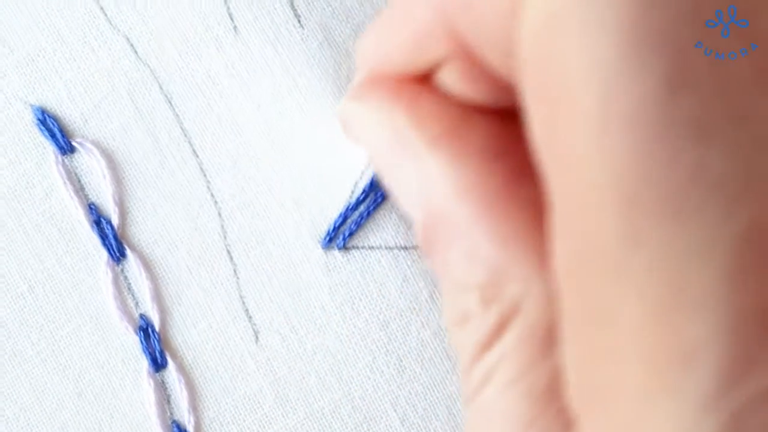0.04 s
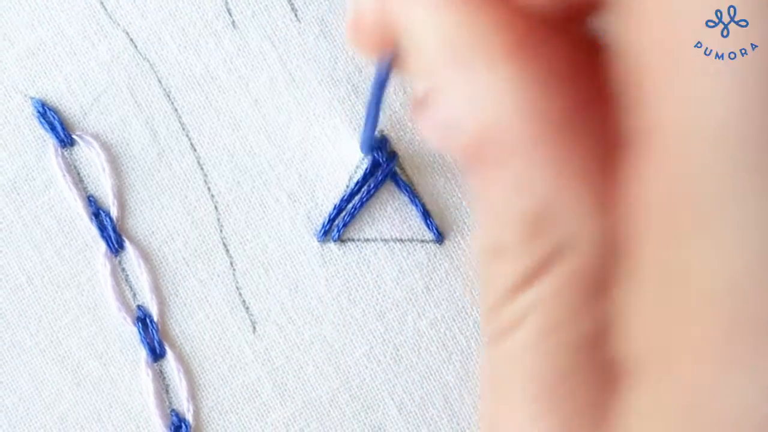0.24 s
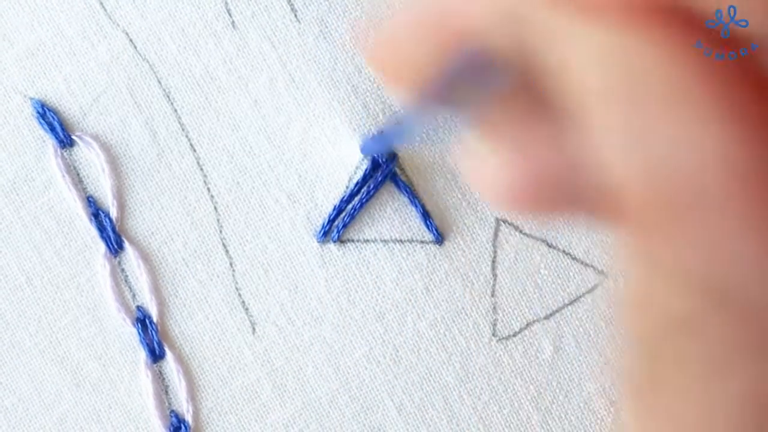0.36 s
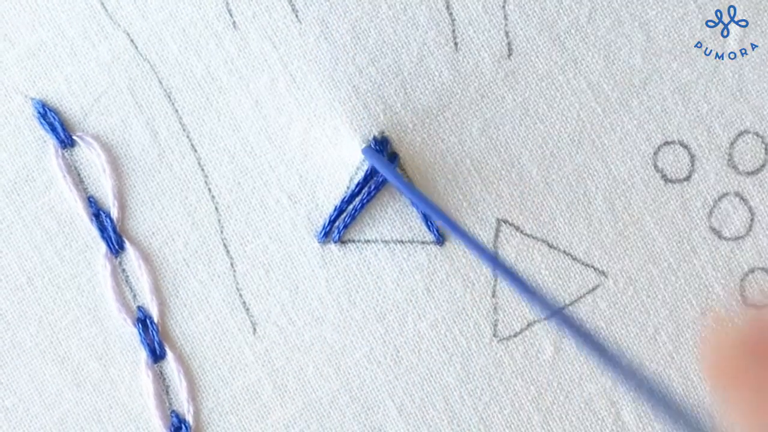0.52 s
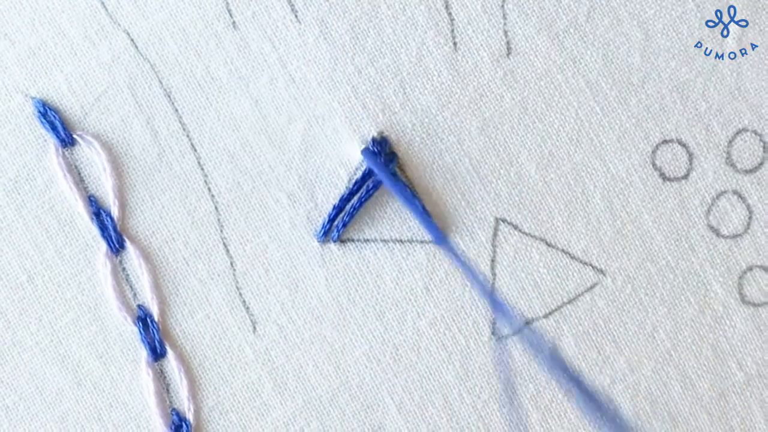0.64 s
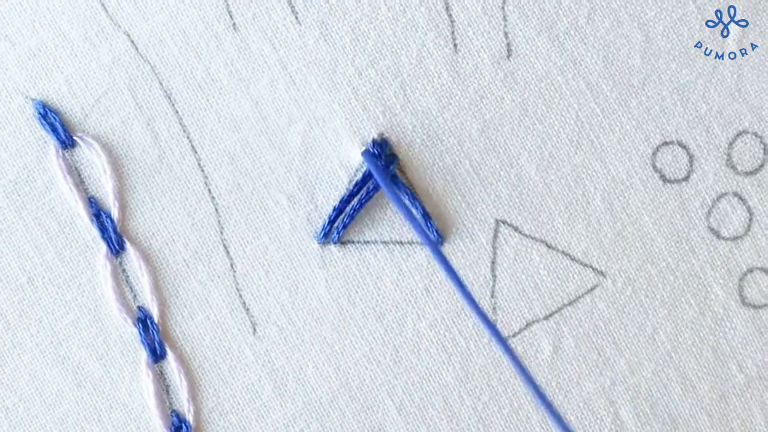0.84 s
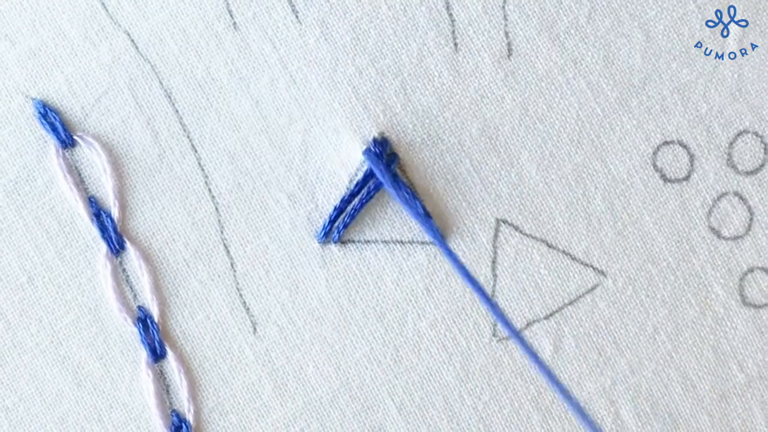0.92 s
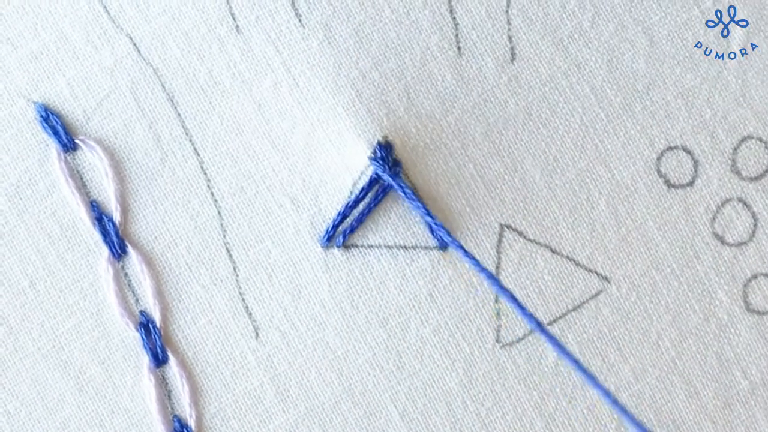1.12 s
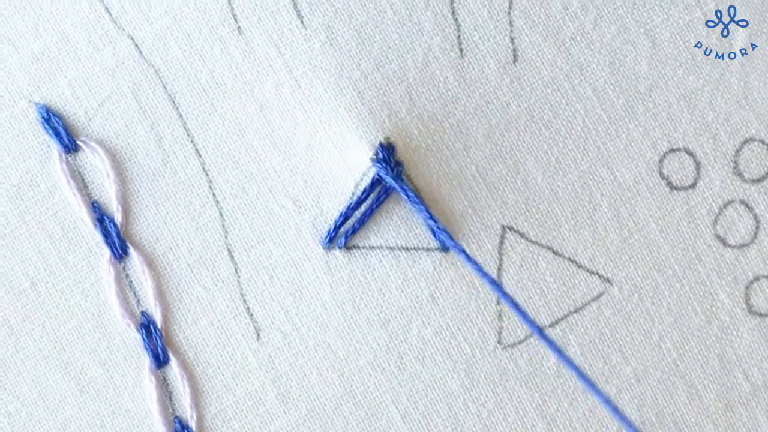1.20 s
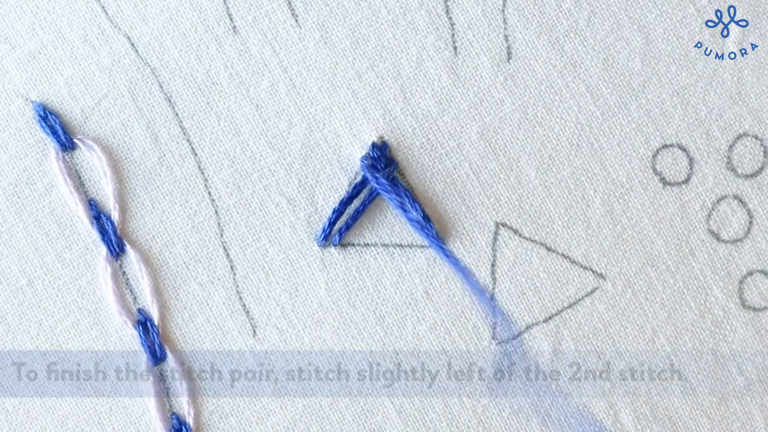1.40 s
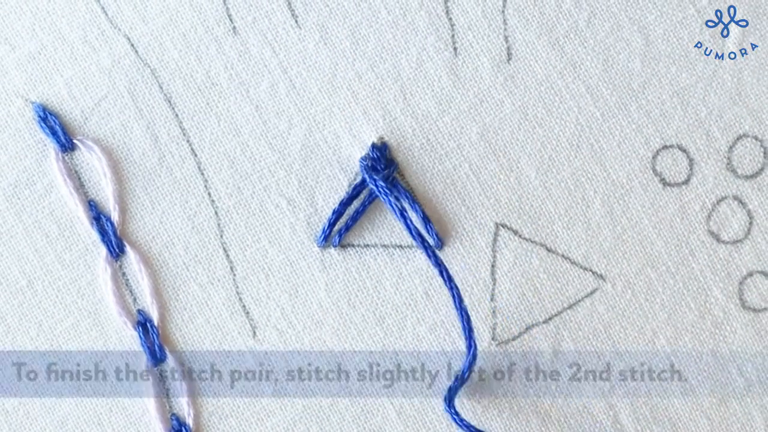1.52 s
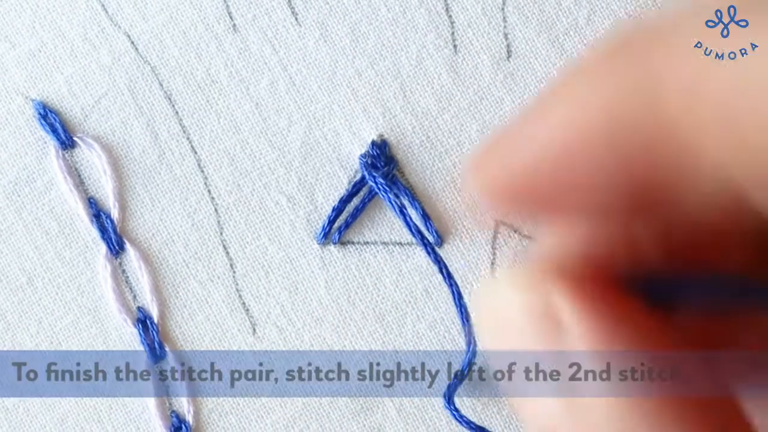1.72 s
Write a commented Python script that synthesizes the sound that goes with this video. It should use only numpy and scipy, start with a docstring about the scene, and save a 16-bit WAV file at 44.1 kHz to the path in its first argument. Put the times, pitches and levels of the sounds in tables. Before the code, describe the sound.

Embroidery thread is pulled through taut cloth, close by in a quiet room. The needle pops through with a small drum-like ring, the thread rasps and snags, then tightens with a soft thump over a faint hum.

```python
"""One embroidery stitch through cloth stretched in a hoop, close by, in a quiet room with a faint hum.
At 0.22 s the needle's eye pops through and the cloth rings like a small drum. The thread then rasps
through the hole in countless tiny slips and snags a few times. From 0.7 s it sings as it tightens,
and at 1.02 s it pulls taut with a soft thump. Near 1.6 s the slack thread settles on the cloth."""
import sys
import numpy as np
from scipy import signal
from scipy.fft import rfft, irfft
from scipy.io import wavfile
from scipy.ndimage import uniform_filter1d

SR = 44100
rng = np.random.default_rng(int(sys.argv[2]) if len(sys.argv) > 2 else 0)


def master_out(mix):
    """Clip the mix to full scale and print it as 16-bit PCM to the path in sys.argv[1]."""
    frames = np.transpose(np.atleast_2d(mix))
    ceiling = np.clip(frames, -1, 1)
    pcm = np.round(ceiling * 32767).astype(np.int16)
    wavfile.write(sys.argv[1], SR, pcm)


N = 77175


def undb(db):
    """Decibels to gain."""
    return 10 ** (np.asarray(db) / 20)


def unit(x):
    """Scale to rms 1."""
    return x / np.sqrt(np.mean(x ** 2))


def curve(table, column=1):
    """Gain over time from one dB column of a table, silent outside it."""
    rows = np.array(table)
    return undb(np.interp(np.arange(N) / SR, rows[:, 0], rows[:, column], left=-np.inf, right=-np.inf))


def through(x, response):
    """Convolve with an impulse response."""
    return signal.fftconvolve(x, response)[:N]


def colour(x, points):
    """Minimum-phase filter with the given (Hz, dB) shape."""
    hz, db = np.array(points).T
    bins_hz = np.maximum(np.fft.rfftfreq(2 * N, 1 / SR), 1)
    gain = undb(np.interp(np.log(bins_hz), np.log(hz), db))
    cepstrum = irfft(np.log(gain))
    cepstrum[1:N] *= 2
    response = np.exp(rfft(cepstrum[:N], 2 * N))
    return irfft(rfft(x, 2 * N) * response)[:N]


def wander(rate_hz):
    """Smooth random drift, rms 1."""
    size = int(SR / rate_hz)
    smoothed = uniform_filter1d(rng.standard_normal(N), size, mode="wrap")
    return unit(uniform_filter1d(smoothed, size, mode="wrap"))


def background(t):
    """Still air and a faint wavering hum."""
    # Each row: frequency in Hz, relative noise density in dB.
    air_spectrum = [(20, -2), (48, 0), (85, -8), (130, -13), (220, -8.5), (400, -11.5), (600, -17.5),
                    (1000, -20.5), (1350, -21), (2500, -26), (8000, -29), (16000, -31)]
    # Each row: frequency in Hz, rms level in dB.
    hum_tones = [(344.5, -84.5), (442.5, -77), (689, -88.5), (1281, -91.5), (1378, -90.5)]
    air_db, drift_hz = -69.5, 1
    hum = np.zeros_like(t)
    for hz, db in hum_tones:
        cycles = np.cumsum(hz + drift_hz * wander(rate_hz=7.1)) / SR
        hum += undb(db) * np.sqrt(2) * np.sin(2 * np.pi * cycles)
    return hum + undb(air_db) * unit(colour(rng.standard_normal(N), air_spectrum))


def room_echo(x, t):
    """Short, diffuse echo of a small room."""
    # Each row: frequency in Hz, relative gain in dB.
    echo_spectrum = [(50, -8.5), (200, 3), (450, -2.5), (1500, 2.5), (5000, 2.5), (15000, -4.5)]
    echo_db, t60_s, delay_s = -19.5, 0.35, 0.0051
    decay = (t > delay_s) * undb(-60 * t / t60_s)
    tail = colour(rng.standard_normal(N), echo_spectrum) * decay
    return undb(echo_db) * through(x, tail / np.sqrt(np.sum(tail ** 2)))


def contact(t, contact_s):
    """Gaussian push of unit area at t = 0; the longer, the softer."""
    return np.exp(-.5 * (t / contact_s) ** 2) / (np.sqrt(2 * np.pi) * contact_s * SR)


def cloth_ring(t):
    """Damped modes of the taut cloth after one sharp push."""
    # Each row: frequency in Hz, level in dB, T60 in seconds.
    modes = [(67.2, -14, 0.15), (114, -12, 0.046), (228, -11.5, 0.063), (303, -12.5, 0.057),
             (358.5, -11.5, 0.083), (387.1, -31, .18), (466, -10, 0.017), (648, -11.5, 0.02),
             (763, -8.5, .023), (899, -21, 0.04), (1210, -7, .009), (1360, -10.5, .012),
             (1647, -15.5, .005), (2600, -31, .018)]
    return sum(undb(db) * np.cos(2 * np.pi * hz * t) * undb(-60 * t / t60_s) for hz, db, t60_s in modes)


def slips(rate_per_s=5000, scatter_db=2.5):
    """Dense, uneven catches of thread fibres on the weave."""
    caught = rng.random(N) < rate_per_s / SR
    sizes = undb(scatter_db * np.minimum(rng.exponential(size=N), 4))
    return caught * sizes * rng.choice([-1, 1], N)


def cloth_rumble(t, contact_s):
    """A stream of slips shakes the cloth."""
    pushes = through(slips(), contact(t - 5 * contact_s, contact_s))
    return unit(through(pushes, cloth_ring(t)))


def thread_note(centre_hz=848, width_hz=108):
    """Slips excite a narrow resonance of the thread."""
    edges_hz = [centre_hz - width_hz / 2, centre_hz + width_hz / 2]
    band = signal.butter(2, edges_hz, "band", fs=SR, output="sos")
    return unit(signal.sosfilt(band, slips()))


def thread(t):
    """The running thread shakes the cloth, rasps and hisses in the hole, sings, then settles."""
    # The pull. Each row: time in seconds, then rumble, rasp, fibre whisper and hiss levels in dB.
    pull_levels = [(.16, -97, -85.5, -100, -100), (.21, -54, -61, -75, -100), (.232, -30, -42, -66, -65),
                   (.285, -37, -43.5, -72.5, -88), (.355, -38, -47, -59.5, -67.5),
                   (.425, -36.5, -45, -61, -69), (.49, -34, -44, -57.5, -69), (.565, -29, -42, -55, -61),
                   (.635, -29, -41, -54.5, -55.5), (.685, -37, -41, -61, -65),
                   (.705, -27, -43.5, -59, -59.5), (.755, -38.5, -54.5, -66.5, -78),
                   (.82, -42.5, -53.5, -64.5, -77), (.89, -40.5, -54.5, -64, -80),
                   (.95, -38, -60.5, -71.5, -80), (.995, -51, -74, -90, -101), (1.02, -37, -64, -78, -74),
                   (1.045, -40.5, -69, -84, -87), (1.16, -75.5, -100, -100, -100),
                   (1.21, -87.5, -100, -100, -100)]
    # Friction spectra. Each row: frequency in Hz, relative density in dB.
    rasp_spectrum = [(300, -20), (470, -6), (540, 5.5), (620, -5), (760, 2), (1000, -0.5), (1140, -16),
                     (1290, -4.5), (1540, -7.5), (1720, -19), (2080, -9.5), (2450, -17.5), (2640, -23),
                     (2830, -19.5), (3100, -24.5), (3400, -25), (5000, -50)]
    whisper_spectrum = [(2300, -24.5), (3100, -17), (3650, -13.5), (4000, 2.5), (4800, 3.5), (5100, -1.5),
                        (5400, -10.5), (5750, -10), (6300, -20.5), (9000, -30), (14500, -24)]
    hiss_spectrum = [(2000, -5.5), (4500, -1.5), (5400, -0.5), (5800, 5), (6250, -2), (6700, 3.5),
                     (7000, 2.5), (7400, 0), (9600, -4.5), (10500, -23.5), (14500, -18.5), (16000, -26.5)]
    # Tightening and settling. Each row: time in seconds, level in dB.
    sing_levels = [(.70, -66), (.76, -51), (.82, -54), (.88, -55), (.97, -57), (.998, -79), (1.02, -45),
                   (1.035, -70), (1.06, -85)]
    settle_levels = [(1.53, -91.5), (1.568, -61.5), (1.595, -69), (1.63, -74)]
    sway_db, flutter_db, slack_note_db = -8.5, 2.77, -10

    shake = cloth_rumble(t, contact_s=0.00052)
    sway = cloth_rumble(t, contact_s=0.0013)  # the hoop rocks softly under the cloth
    rumble = unit(shake + undb(sway_db) * sway)
    rub = slips() * undb(flutter_db * wander(rate_hz=24))  # the thread's twist roughens the pull
    rasp = unit(colour(rub, rasp_spectrum)) * curve(pull_levels, column=2)
    whisper = unit(colour(rub, whisper_spectrum)) * curve(pull_levels, column=3)
    hiss = unit(colour(slips(), hiss_spectrum)) * curve(pull_levels, column=4)
    running = rumble * curve(pull_levels, column=1) + rasp + whisper + hiss
    note = thread_note()
    settling = (rumble + undb(slack_note_db) * note) * curve(settle_levels)
    return running + note * curve(sing_levels) + settling


def pop_crackle(age_s, peak_db=-33, decay_s=0.002):
    """A short, bright noise burst crackles on top of the pop."""
    # Each row: frequency in Hz, relative density in dB.
    crackle_spectrum = [(1500, -12), (2900, -4), (3600, -2), (4250, -20.5), (4800, 3), (5400, 4.5),
                        (6300, -15), (7500, -7.5), (10000, -21), (16000, -22.5)]
    envelope = (age_s >= 0) * np.exp(-np.abs(age_s) / decay_s)
    burst = colour(envelope * rng.standard_normal(N), crackle_spectrum)
    return undb(peak_db) * burst / np.abs(burst).max()


def tugs(t):
    """Each tug drums on the cloth; the first, the needle's pop, has a bright crackle on top."""
    # The needle's pop, snags, the thread pulling taut with a tick, a light touch.
    # Each row: time in seconds, impulse level in dB, contact time in seconds.
    pushes = [(0.221, 1.5, 0.00017), (0.31, 1, 0.0058), (0.462, -13, .0013), (0.5764, -15, 0.001),
              (0.5906, -16.5, 0.0037), (.7090, -16, 0.00029), (0.7195, -11, 0.0045), (1.0158, -13, 0.00085),
              (1.0165, -52.5, 0.000052), (1.666, -43, .002)]
    force = sum(undb(db) * contact(t - at_s, contact_s) for at_s, db, contact_s in pushes)
    pop_s = pushes[0][0]
    return through(force, cloth_ring(t)) + pop_crackle(t - pop_s)


def scene():
    """One stitch in the room, mono."""
    t = np.arange(N) / SR
    stitch = tugs(t) + thread(t)
    return (stitch + room_echo(stitch, t) + background(t))[None]


def record(dry):
    """Cut the deepest bass, soft-limit the pop, cut the top."""
    low_cut_hz, ceiling, top_hz = 30, 0.755, 15750
    x = signal.sosfilt(signal.butter(1, low_cut_hz, "high", fs=SR, output="sos"), dry)
    x = x / (1 + (x / ceiling) ** 8) ** (1 / 8)
    return signal.sosfilt(signal.ellip(10, .1, 80, top_hz, fs=SR, output="sos"), x)


dry = scene()
out = record(dry)
master_out(out)
```